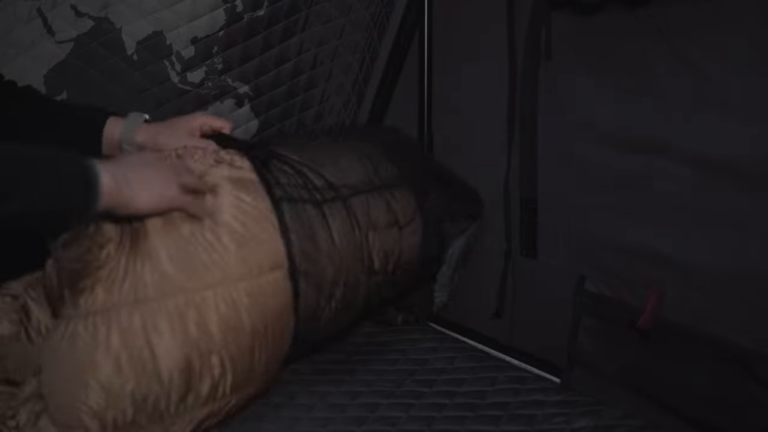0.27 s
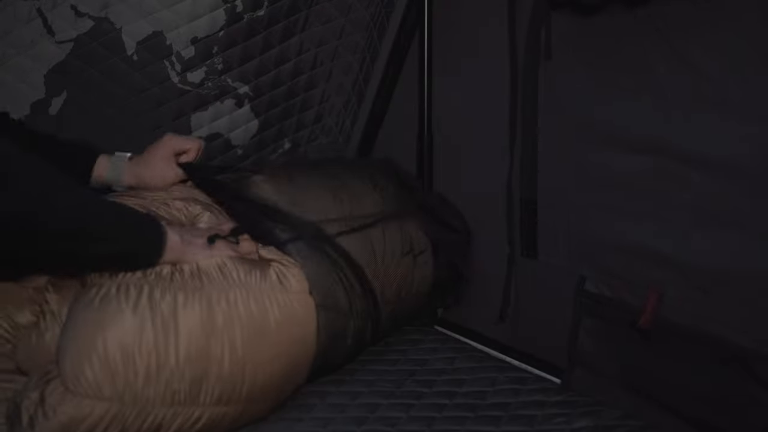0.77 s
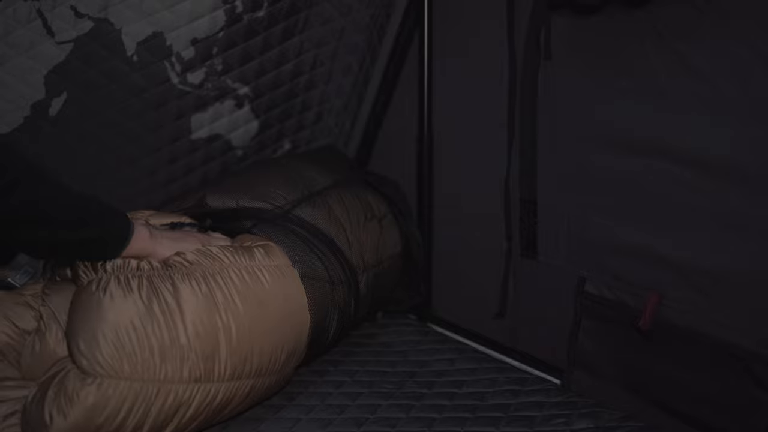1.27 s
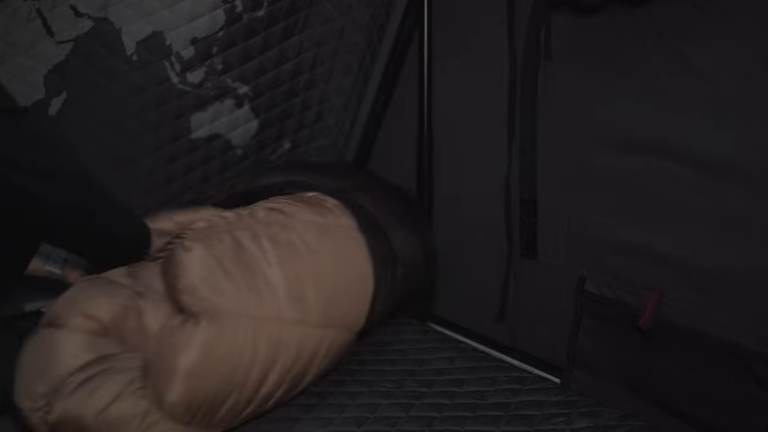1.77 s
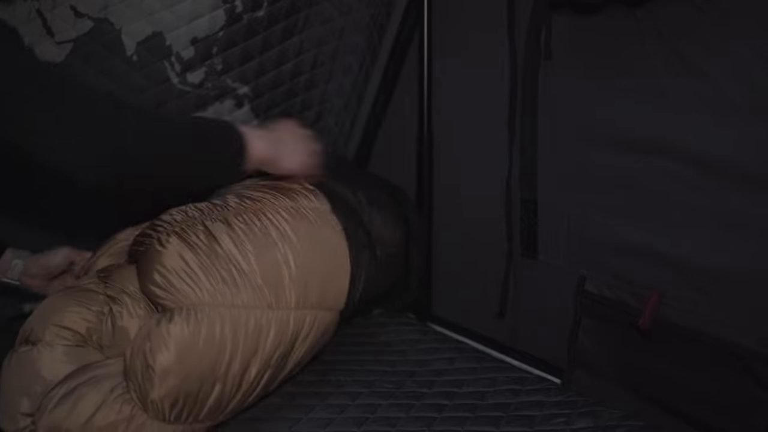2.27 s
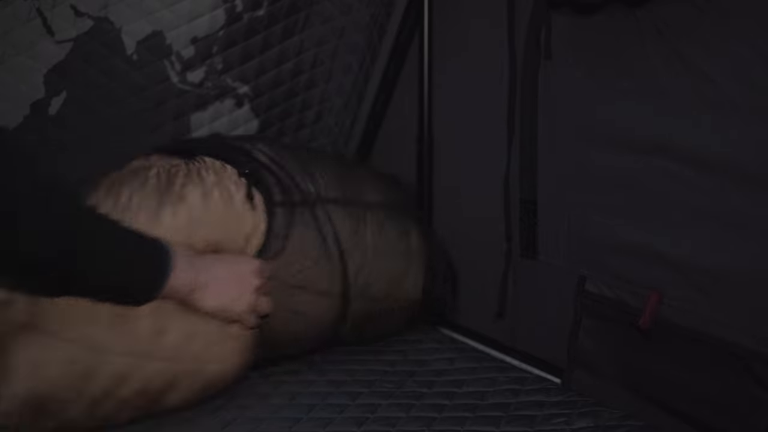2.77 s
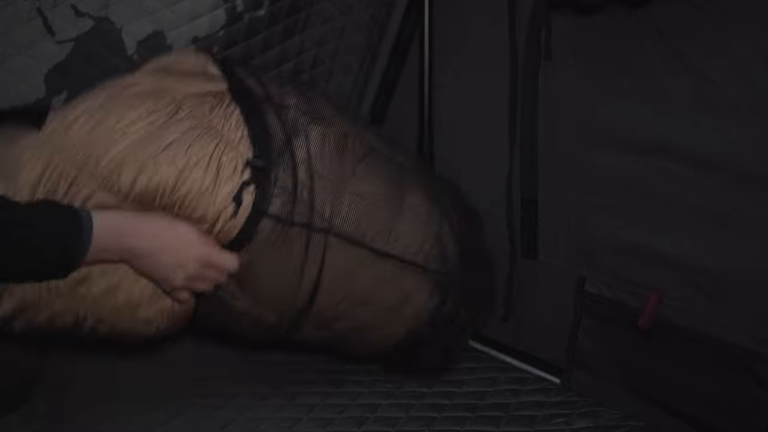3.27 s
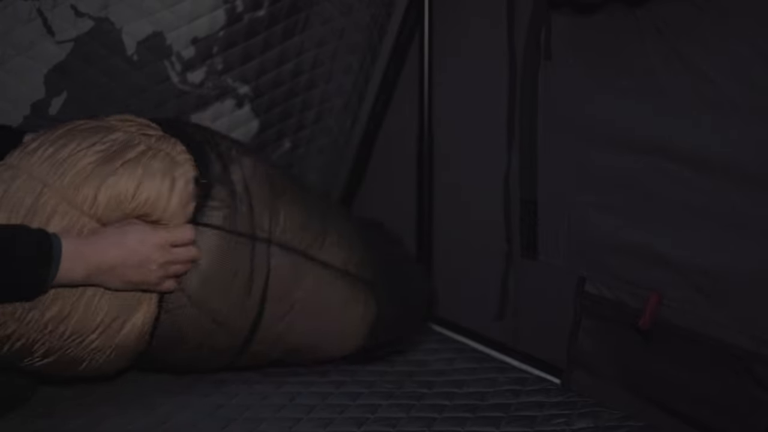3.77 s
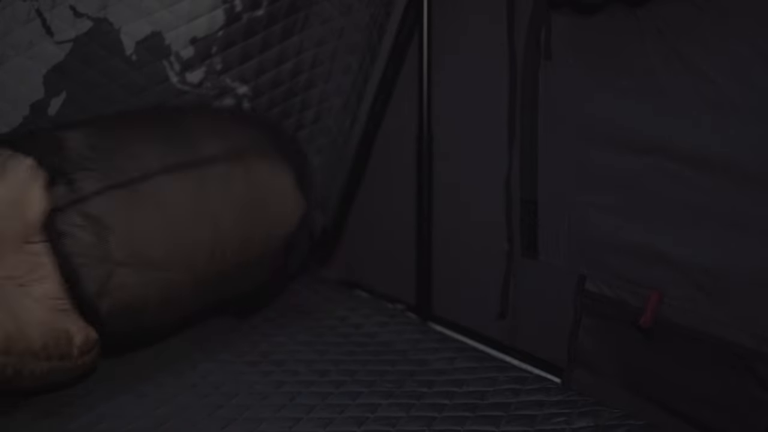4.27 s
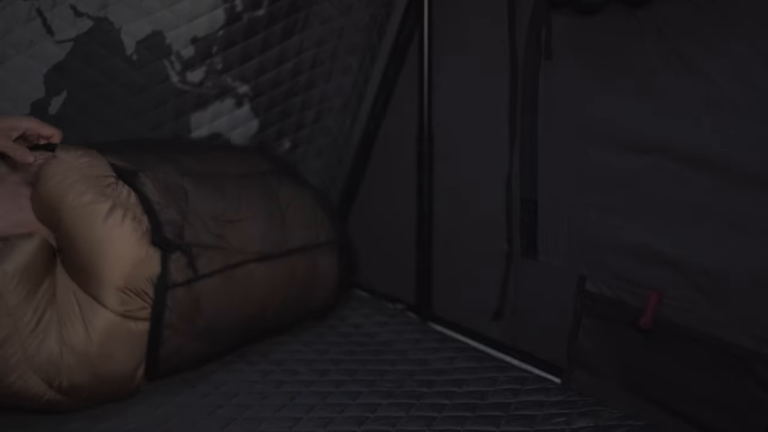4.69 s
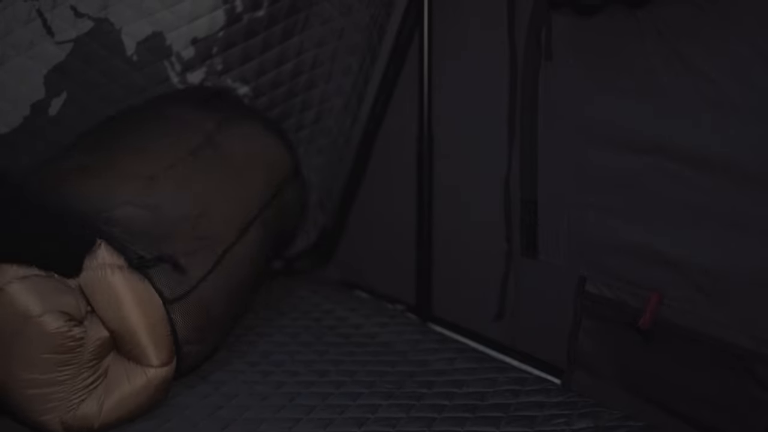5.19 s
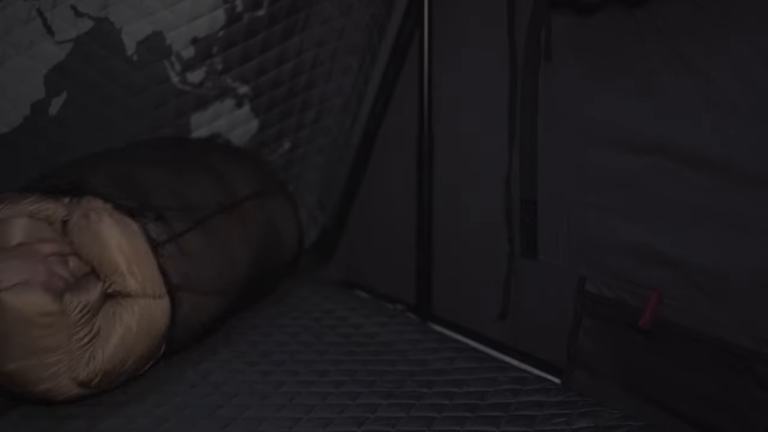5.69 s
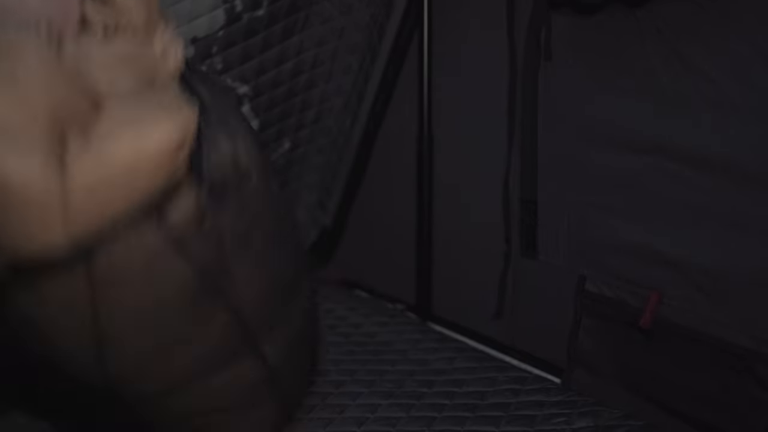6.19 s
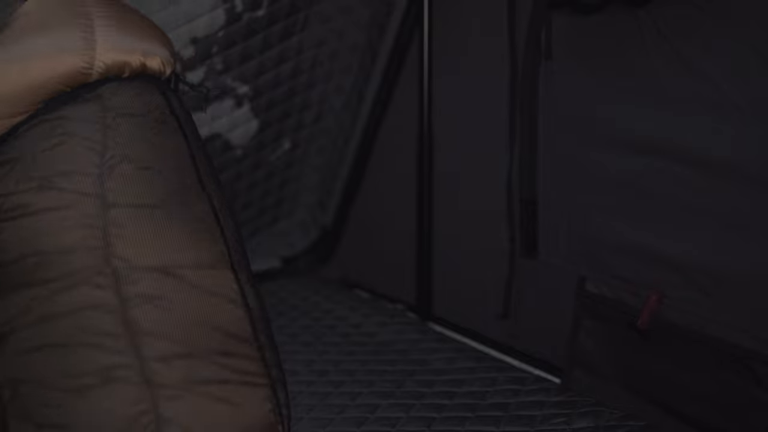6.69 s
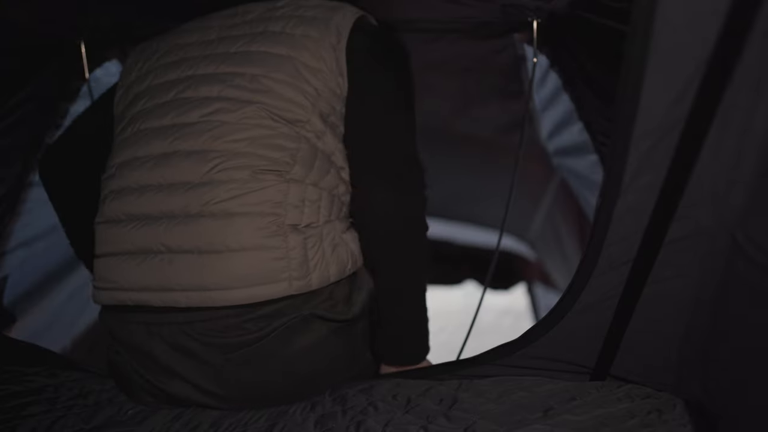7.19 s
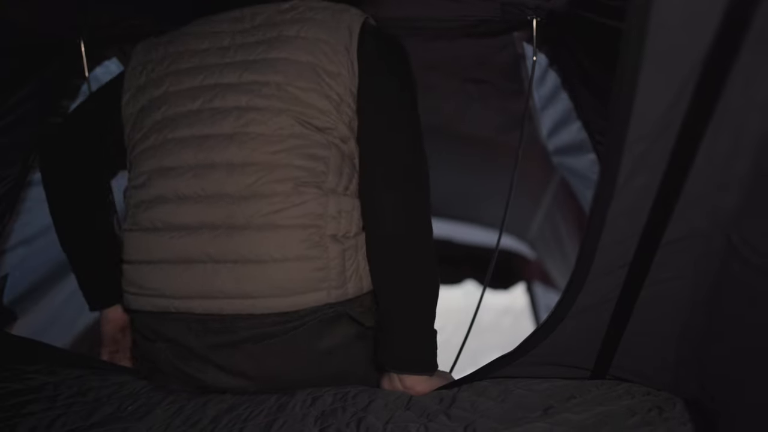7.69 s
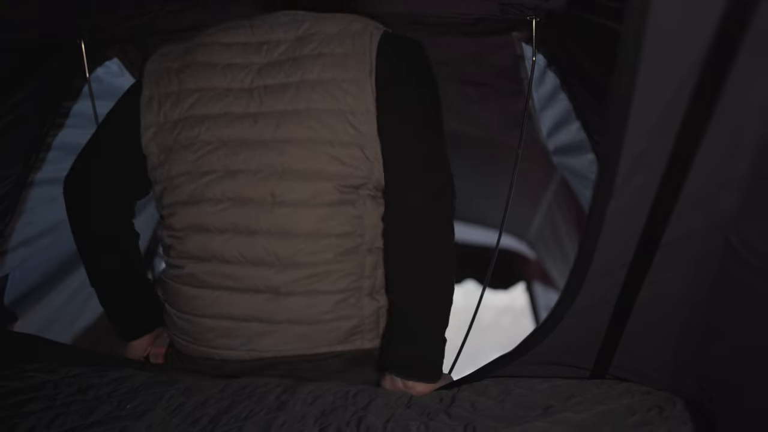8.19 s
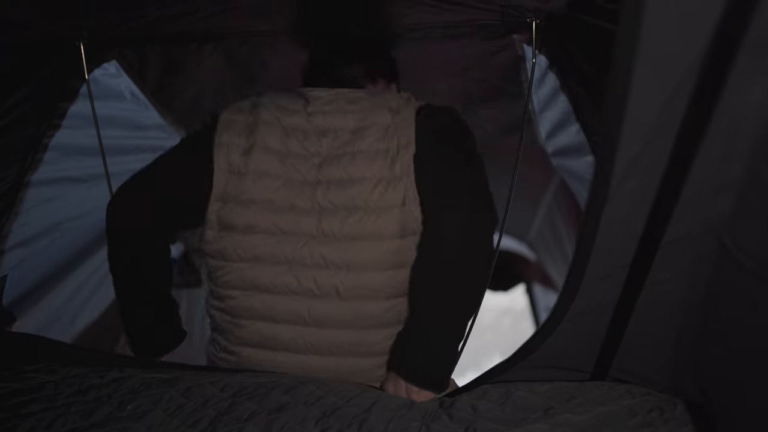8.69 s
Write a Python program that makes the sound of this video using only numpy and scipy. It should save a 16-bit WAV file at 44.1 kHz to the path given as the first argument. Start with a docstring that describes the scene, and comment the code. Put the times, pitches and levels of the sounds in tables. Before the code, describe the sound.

Slippery fabric rustles in uneven strokes, some sharp and airy, others dull and crumpled. Light thuds and a brief juddering patter on the padded floor punctuate the handling. A rising scrape of cloth is followed by the loudest double thump, then the sound drops to soft, duller clothing rustle, mat creaks and small knocks. Dry, close, small tent space, with low air stirring at the microphone.

```python
"""A nylon sleeping bag is stuffed into its sack on a tent floor, close to one microphone.
Each push is a swell of shaped hiss, with duller hiss for slack folds and narrow hiss for ribbed threads.
The mat creaks and knocks as ringing modes, while the load rumbles as low noise and thumps as short tones.
From 7.16 s we hear the open door: someone shifts on the mat further off. Slow swings of air, made of
very low noise, stir at the microphone throughout, strongest at the start and rising and sinking later."""
import sys
import numpy as np
from scipy import signal
from scipy.io import wavfile
from scipy.ndimage import uniform_filter1d

SR = 44100
rng = np.random.default_rng(int(sys.argv[2]) if len(sys.argv) > 2 else 0)


def volts_from_db(level):
    """Convert decibel levels to linear amplitude ratios."""
    exponent = np.asarray(level, float) / 20
    return 10 ** exponent


def master_out(mix):
    """Clip the mix to full scale and print it as 16-bit PCM to the path in sys.argv[1]."""
    frames = np.transpose(np.atleast_2d(mix))
    ceiling = np.clip(frames, -1, 1)
    pcm = np.round(ceiling * 32767).astype(np.int16)
    wavfile.write(sys.argv[1], SR, pcm)


N = 394254  # length in samples
DOOR_S = 7.16  # from here on we hear the door

# air stirring at the microphone: t/s, relative level/dB
AIR_LEVEL = [(0.0, -19), (0.25, -24), (0.62, -45.5), (3.19, -44), (3.34, -33.5), (6.62, -63), (6.85, -35),
             (8.79, -30), (8.94, -40)]
# colour of the rumbling load: f/Hz, relative level/dB
RUMBLE_COLOUR = [(25, -34), (60, 6), (120, -0.5), (250, -3), (400, -9), (520, -15), (900, -30.5)]
# weight pressed into the mat: t/s, relative creak level/dB, relative rumble level/dB
LOAD = [(0.0, -57, -46), (0.79, -43.5, -57), (1.04, -47.5, -45), (1.32, -53.5, -53.5), (1.84, -45, -49.5),
        (2.02, -49, -50.5), (2.46, -54, -56), (2.69, -50, -50.5), (3.53, -53, -54.5), (3.91, -42, -45),
        (4.58, -43, -49.5), (5.1, -48, -51), (5.35, -51, -52.5), (6.3, -48.5, -46.5), (6.62, -39.5, -44),
        (6.89, -39, -38), (7.22, -48, -49), (7.97, -45.5, -45), (8.51, -47.5, -45.5), (8.94, -51.5, -53)]
# the load drags and patters in small lumps: start t/s, length/s, relative level/dB
SCUFFS = [(2.051, .15, -48), (2.697, .16, -28.5), (3.191, .14, -30), (3.798, .1, -26), (4.281, 0.054, -38),
          (5.781, 0.13, -33), (6.577, 0.12, -37), (6.869, 0.055, -31), (7.145, 0.16, -38),
          (7.95, 0.086, -43), (8.44, 0.065, -40)]
# the load drops on the mat: t/s, relative level/dB, f/Hz at the top of the thump, relative length/ms
THUMPS = [(0.185, -17, 162, 3.2), (0.194, -16, 120, 3.3), (0.775, -27, 133, 5.5), (0.838, -23.5, 223, 8.8),
          (1.95, -14, 213, 3.2), (2.094, -30, 107, 8.7), (2.182, -24, 108, 4), (2.306, -29, 109, 6.6),
          (2.739, -18, 121, 7.5), (3.26, -24, 212, 2.1), (3.284, -23, 205, 2.3), (3.74, -17, 158.5, 4.4),
          (3.761, -14.5, 142, 3.9), (3.776, -18.5, 115, 19), (3.839, -19, 167, 5), (3.87, -22, 133, 17),
          (3.91, -21.5, 190.3, 4.6), (4.297, -25.5, 120, 7.6), (5.391, -27, 130, 4.5),
          (5.819, -21.5, 150, 9.6), (6.363, -25, 184, 4.4), (6.417, -22, 170, 1.4), (6.49, -22, 165, 1.6),
          (6.538, -26.5, 156.3, 4.2), (6.68, -29.5, 55.8, 29), (6.72, -15, 195.5, 2.3),
          (6.839, 4.5, 264, 1.66), (6.853, -3, 128, 16), (6.874, -10, 140, 2.7), (6.91, -24, 109, 13),
          (7.021, -18.5, 166, 8.4), (7.043, -10.5, 153, 6.6), (7.616, -19.5, 220, 3),
          (7.633, -24, 172, 9.3), (7.995, -29, 244, 2), (8.184, -22, 227, 2.9), (8.477, -26, 270, 7.6),
          (8.499, -34, 84.7, 40)]
# ringing modes of the mat: f/Hz, relative level/dB
MAT_MODES = [(900, 1), (421, -13.5), (613, -5), (1334, -7.5), (1680, -5), (2746, -9), (3350, -22),
             (4400, -15.5)]
# the mat slips and knocks: t/s, relative level/dB, relative length/ms
KNOCKS = [(0.795, -30, 3.8), (1.945, -9.5, 1.46), (1.953, -21, 5.6), (2.354, -32.5, 4), (2.433, -35.5, 4.4),
          (2.735, -25.5, 4.6), (3.258, -35, 3.3), (3.284, -29, 2.9), (3.857, -26, 2.7), (3.909, -18.5, 3.6),
          (5.82, -29.5, 3.6), (5.873, -34, 3), (5.936, -34, 3), (6.362, -35, 3), (6.49, -31.5, 5.2),
          (6.538, -25, 3.4), (6.722, -16.5, 4.3), (6.83, -26, 4.9), (6.841, -3.5, 9.4), (6.852, -20, 5.2),
          (7.018, -21, 12.5), (7.032, -15.5, 4.3), (7.043, -9, 4.7), (7.053, -14.5, 6.5),
          (7.619, -28.5, 4.6), (7.994, -36, 2.5), (8.184, -33, 1.8), (8.324, -33, 1.5), (8.476, -34, 2)]
# small hard parts click: t/s, relative level/dB
TICKS = [(1.943, -28), (2.3012, -30), (2.352, -34), (2.403, -37), (2.428, -27), (3.256, -26), (3.2807, -26),
         (3.7047, -19.5), (3.728, -23), (3.7394, -15), (3.7678, -21), (3.7804, -16.5), (6.719, -25),
         (6.8366, -11), (7.043, -25), (8.323, -24), (8.5252, -36)]
# tones of the zip tab: f/Hz, starting level/dB, time to fade by 60 dB/s
TAB_TONES = [(12220, -48, .06), (14640, -44, .12), (13700, -54, .08)]
# threads skip over ribs and sing, one list a stroke: t/s, rib rate f/Hz, level/dB
RIB_STROKES = [
    [(0.0, 1880, -46), (.09, 3900, -39), (.13, 4350, -39), (.2, 5800, -50)],
    [(6.07, 4800, -53), (6.14, 6540, -40), (6.18, 7540, -37), (6.24, 8000, -32), (6.3, 7960, -36),
     (6.35, 5330, -53), (6.38, 2750, -42), (6.4, 1720, -26), (6.415, 900, -31.5), (6.435, 150, -27)],
]
# colour of the near cloth: f/Hz, relative level/dB
NEAR_CLOTH = [(1760, -9), (3000, -2), (3280, -1), (7850, 3), (10600, -4), (13200, -3.5), (15500, -8.5)]
# colour of the cloth at the door: f/Hz, relative level/dB
DOOR_CLOTH = [(1760, -51), (3000, -7), (8470, -6), (10500, -16), (13600, -15), (15500, -34)]
# colour of the slack folds: f/Hz, relative level/dB
FOLD_COLOUR = [(250, -69), (600, 0), (1200, -1), (2600, 0), (4000, -7), (12000, -43)]
# pushes of the hands: top speed t/s, swish level/dB, rise/s and fall/s over 12 dB,
# level of slack folds against the swish/dB
STROKES = [(0.12, -34, 0.44, 0.151, -13), (0.278, -32.5, 0.089, 0.018, -7.5),
           (0.371, -33.5, 0.045, 0.11, -3), (0.668, -18.5, 0.17, 0.083, -14.5),
           (0.796, -35.5, 0.031, 0.26, -4), (1.089, -29.0, 0.16, 0.15, -5.5), (1.61, -34, 0.1, 0.044, -10),
           (1.925, -49.5, 0.18, 0.015, -4.5), (1.973, -31, 0.49, 0.069, -4.5),
           (2.187, -43.0, 0.34, 0.022, -5), (2.241, -40.5, 0.117, 0.036, -10),
           (2.342, -40.5, 0.064, 0.016, -7), (2.412, -38, 0.0089, 0.07, -1.5),
           (2.556, -38.5, 0.035, 0.091, -0.5), (2.76, -28, 0.12, 0.19, -6),
           (3.198, -42.5, 0.49, 0.45, -3.5), (3.634, -35, 0.1, 0.024, -4), (3.743, -35.5, 0.051, 0.056, 4),
           (3.884, -26.5, 0.043, 0.033, -5.5), (4.04, -22, 0.2, 0.097, -16), (4.147, -26.0, 0.23, 0.04, -7),
           (4.303, -31.5, 0.18, 0.03, -6.5), (4.547, -29.5, 0.23, 0.1, -7),
           (5.001, -19.5, 0.2, 0.14, -13.5), (5.236, -27.5, 0.43, 0.06, -6),
           (5.406, -35, 0.083, 0.14, -7.5), (5.553, -35, 0.071, 0.11, -15),
           (5.702, -40.5, 0.041, 0.54, -0.5), (5.946, -38.5, 0.32, 0.085, -4),
           (6.249, -33, 0.32, 0.104, -12.5), (6.393, -33, 0.099, 0.032, -8),
           (6.479, -32.5, 0.062, 0.14, -7), (6.832, -24.5, 0.039, 0.014, -9),
           (6.893, -24.5, 0.023, 0.031, -10), (7.072, -29.5, 0.52, 0.066, -4), (7.443, -47, 0.45, 0.8, 0.5),
           (7.876, -43, 0.184, 0.38, -1), (8.438, -44, 0.31, 0.18, -1), (8.881, -49, 0.046, 0.127, -3)]


def evened(x):
    """Scales a sound to an rms (average strength) of 1."""
    return x / np.sqrt(np.mean(x ** 2) + 1e-20)


def read(points, hz):
    """Reads a colour table at any frequency, on a logarithmic pitch scale."""
    f, value = np.transpose(points)
    return np.interp(np.log(hz + 1), np.log(f + 1), value)


def curve(rows, index):
    """Draws one column of a table as a line over the whole scene."""
    rows = np.array(rows)
    return np.interp(np.arange(N) / SR, rows[:, 0], rows[:, index])


def add(mix, s, sound):
    """Adds a short sound to the mix, starting at s seconds."""
    part = mix[max(round(s * SR), 0):][:len(sound)]
    part += sound[:len(part)]


def noise(colour, size, patchy_db, flicker_db):
    """Random short-time spectra of one colour, with drifting patches and a shared flicker."""
    hop = size // 4
    frames, hz = N // hop + 5, np.fft.rfftfreq(size, 1 / SR)
    a, b, patches = rng.standard_normal((frames, len(hz), 3)).T
    patches = uniform_filter1d(patches, size=6, axis=0)  # smooth over frequency
    patches = evened(uniform_filter1d(patches, size=14, axis=1))  # smooth over time
    flicker = evened(uniform_filter1d(rng.standard_normal(frames), size=5))
    field_db = read(colour, hz)[:, None] + patchy_db * patches + flicker_db * flicker
    spectra = (a + 1j * b) * volts_from_db(field_db)
    return evened(signal.istft(spectra, nperseg=size, noverlap=size - hop)[1][:N])


def resonate(x, hz, width_hz):
    """Picks out a band: shifts the curve hz down to zero, smooths twice, and shifts back."""
    turn = np.exp(2j * np.pi * np.cumsum(hz) / SR)
    r = np.exp(-np.pi * width_hz / SR)
    once = signal.lfilter([1 - r], [1, -r], x / turn)
    twice = signal.lfilter([1 - r], [1, -r], once)
    return (turn * twice).real


def air():
    """Slow pressure swings, noise around 15 Hz, too low to hear as a pitch."""
    hz = np.full(N, 15.0)
    swing = resonate(rng.standard_normal(N), hz, 8.1)
    return volts_from_db(curve(AIR_LEVEL, index=1) - 7.5) * evened(resonate(swing, hz, 54))


def rumble():
    """The load shifts in lumps on the padded floor, heard as low, patchy noise."""
    shifting = noise(RUMBLE_COLOUR, size=1024, patchy_db=1.5, flicker_db=2)
    return volts_from_db(curve(LOAD, index=2) + 3.5) * shifting


def mat_ring(ms, draw, spread, heavy_db):
    """The mat modes after one slip at a chance spot; high modes die faster, heavy_db lifts low ones."""
    t = np.arange(900) / SR
    spot = 1 + spread * (draw[len(MAT_MODES)] - .5)  # shifts all pitches together
    modes = np.zeros(len(t))
    for (hz, db), phase in zip(MAT_MODES, draw):
        fade = np.exp(-t / (ms / 1000) * (hz / 900) ** .5)
        tone = np.sin(2 * np.pi * (hz * spot * t + phase))
        modes += volts_from_db(db + heavy_db * (hz < 700)) * fade * tone
    return modes * np.sin(np.minimum(t / 0.0011, 1) * np.pi / 2) ** 2  # swells over 1.1 ms


def creak():
    """Many small slips of random size ring the mat: one patch under the bag, all over it at the door."""
    slips_per_s = 400
    size = volts_from_db(1.5 * np.minimum(rng.exponential(1, N), 4)) * (rng.random(N) < slips_per_s / SR)
    door = np.arange(N) > DOOR_S * SR
    spot = rng.integers(0, 10, N) + 10 * door  # ten spots near, ten more at the door
    out = np.zeros(N)
    for k, draw in enumerate(rng.random((20, len(MAT_MODES) + 1))):
        ring = mat_ring(2.3, draw, 0.26, -3.7) if k < 10 else mat_ring(3.6, draw, 0.98, 2.5)
        out += signal.oaconvolve(size * (spot == k), ring)[:N]
    return volts_from_db(curve(LOAD, index=1) + 0.3) * evened(out)


def lumps():
    """Rows (t/s, dB, Hz, ms) of chance lumps inside each scuff, likely strongest in its middle."""
    lumps_per_s, spread_db = 85, 7.5
    rows = []
    for start, length, db in SCUFFS:
        count = max(int(length * lumps_per_s), 1)
        a, b, c, d = rng.random((count, 4)).T
        place = (np.arange(count) + a) / count  # 0 to 1 along the scuff
        level = db - spread_db * (b + (2 * place - 1) ** 2 - .5)
        hz = np.interp(c, (0, 1), (110, 285))
        ms = np.interp(d, (0, 1), (1.7, 7.5))
        rows += zip(start + place * length, level, hz, ms)
    return rows


def thumps(small):
    """A thump of falling pitch has a quick swell and a slower fade, and the floor booms under it."""
    out, t = np.zeros(N), np.arange(-1000, 3000) / SR
    rows = THUMPS + small
    for (s, db, hz, ms), phase in zip(rows, rng.random(len(rows))):
        u = t / (ms * 0.00074)
        shape = np.where(t < 0, np.exp(-(u / .5) ** 2), np.exp(-abs(u) / 1.01))
        turns = hz * t * (1 - 8.0 * t) + phase
        push = np.cos(2 * np.pi * turns) + 0.33 * np.cos(np.pi * turns)  # the floor gives an octave lower
        add(out, s + t[0], volts_from_db(db + 1.0) * shape * push)
    floor_hz, floor_width_hz, floor_db, bass_cut_hz = 79.5, 28, 4, 50
    out += volts_from_db(floor_db) * resonate(out, np.full(N, floor_hz), floor_width_hz)
    return signal.lfilter(*signal.butter(2, bass_cut_hz, "high", fs=SR), out)


def judder():
    """Knock rows for the mat juddering under a knee: slips at an even rate swell and fade unevenly."""
    start_s, end_s, slips_per_s = 3.695, 3.82, 81.5
    top_s, arch_s = 3.76, 0.048  # strongest moment; 8.7 dB weaker this far from it
    s = np.arange(start_s, end_s, 1 / slips_per_s)
    db = -19 - 8.7 * ((s - top_s) / arch_s) ** 2 - 3 * rng.random(len(s))
    return list(zip(s, db, np.full(len(s), 3.0)))


def knocks(small):
    """A large slip is a short scrape of noise that rings the mat; each small lump knocks too."""
    out, t = np.zeros(N), np.arange(-500, 900) / SR
    lump_knock_db = -7.5
    rows = KNOCKS + judder() + [(s, db + lump_knock_db, ms) for s, db, hz, ms in small]
    for s, db, ms in rows:
        draw = rng.random(len(MAT_MODES) + len(t))
        shape = np.exp(-abs(t) / (np.where(t < 0, .35, .7) * ms / 1000))
        scrape = (draw[len(MAT_MODES):] - .5) * shape
        # longer slips count as heavier
        knock = signal.fftconvolve(scrape, mat_ring(1.4, draw, 0.18, 1.05 * (ms - 3.5)))
        add(out, s + t[0] - .0015, volts_from_db(db + 4.5) * knock / abs(knock).max())
    return out


def ticks():
    """Small hard parts click: fast-fading bursts of noise, kept mainly between 900 and 6500 Hz."""
    out, t = np.zeros(N), np.arange(300) / SR
    dull = signal.butter(2, [900, 6500], "band", fs=SR)
    for s, db in TICKS:
        burst = rng.standard_normal(len(t)) * np.exp(-t / 0.0027)
        add(out, s, volts_from_db(db + 3.0) * signal.lfilter(*dull, burst))
    return out


def chink():
    """A zip tab chinks once: a few high, fading tones."""
    out, t = np.zeros(N), np.arange(SR // 5) / SR
    for hz, db, t60 in TAB_TONES:
        add(out, 8.352, volts_from_db(db - 60 * t / t60) * np.sin(2 * np.pi * hz * t))
    return out


def steady_band():
    """A thin band of hiss holds its pitch under the fast stroke."""
    start_s, length_s, hz, width_hz, db = 6.1, .22, 4050, 500, -47
    out = np.zeros(N)
    hiss = rng.standard_normal(round(length_s * SR))
    band = evened(resonate(hiss, np.full(len(hiss), hz), width_hz))
    add(out, start_s, volts_from_db(db) * band * signal.windows.tukey(len(hiss), .3))
    return out


def rib_song():
    """Threads skip over ribs: hiss narrowed around the rib rate; slow sliding sings a cleaner note."""
    out = np.zeros(N)
    for rows in RIB_STROKES:
        s, hz, db = np.transpose(rows)
        t = np.arange(s[0], s[-1], 1 / SR)
        hz, hiss = np.interp(t, s, hz), rng.standard_normal(len(t))
        slow = np.clip((3500 - hz) / 1000, 0, 1)
        wide = evened(resonate(hiss, hz, 1100))
        narrow = evened(resonate(hiss, hz, 500))
        tone = (1 - slow) * wide + slow * narrow
        add(out, s[0], volts_from_db(np.interp(t, s, db)) * tone * signal.windows.tukey(len(t), .1))
    return out


def speed():
    """Levels in dB of swish and slack folds: the powers of all strokes add up over the rest level."""
    rest_db, rest_slack_db = -54.5, -59  # swish and folds between strokes
    pointed = 1.4  # power of the slope away from the top
    t = np.arange(0, N + 64, 64)[:, None] / SR
    s, db, rise, fall, slack_db = np.transpose(STROKES)
    away = abs(t - s) / np.where(t < s, rise, fall)
    power = volts_from_db(db - 12 * away ** pointed) ** 2
    swish_power = volts_from_db(rest_db) ** 2 + power.sum(axis=1)
    slack_power = volts_from_db(rest_slack_db) ** 2 + power @ volts_from_db(slack_db) ** 2
    return [np.interp(np.arange(N) / SR, t[:, 0], 10 * np.log10(p)) for p in (swish_power, slack_power)]


def swish():
    """Countless thread slips blur into hiss; slack folds add a duller voice to each stroke."""
    near, far, folds = (noise(colour, size=256, patchy_db=1.2, flicker_db=0.33)
                        for colour in (NEAR_CLOTH, DOOR_CLOTH, FOLD_COLOUR))
    speed_db, slack_db = speed()
    cloth = np.where(np.arange(N) < DOOR_S * SR, near, far)
    return volts_from_db(speed_db) * cloth + volts_from_db(slack_db) * folds


def scene():
    """One microphone feeds both channels."""
    small = lumps()
    background = air() + rumble() + creak()
    blows = thumps(small) + knocks(small) + ticks() + chink()
    cloth = steady_band() + rib_song() + swish()
    return np.tile(background + blows + cloth, (2, 1))


def band_limit(x):
    """A steep low-pass at the top of the band."""
    return signal.sosfilt(signal.butter(12, 16760, fs=SR, output="sos"), x)


def record(dry):
    """A limiter ducks the sound when its level passes -10 dB, then lets go; soft clip and treble cut."""
    level_db = 10 * np.log10(abs(uniform_filter1d(dry[0] ** 2, size=300)) + 1e-12)
    fall = np.arange(N) * 170.0 / SR  # the held level sinks by 170 dB a second
    held_db = np.maximum.accumulate(level_db + fall) - fall
    over_db = np.maximum(held_db + 10.0, 0)
    ducked = dry / volts_from_db(.7 * uniform_filter1d(over_db, size=100))
    limited = .8 * np.tanh(ducked / .8)
    edge = signal.firwin(511, 15750, window=("kaiser", 9), fs=SR)  # keeps what lies below 15750 Hz
    finished = signal.oaconvolve(limited, edge[None], "same")
    return band_limit(finished)


dry = scene()
out = record(dry)
master_out(out)
```